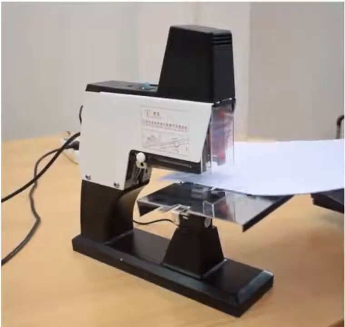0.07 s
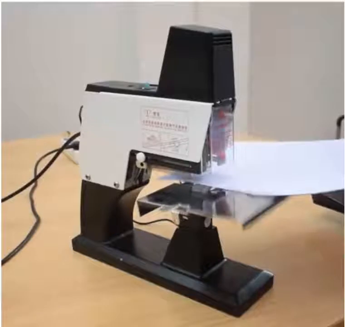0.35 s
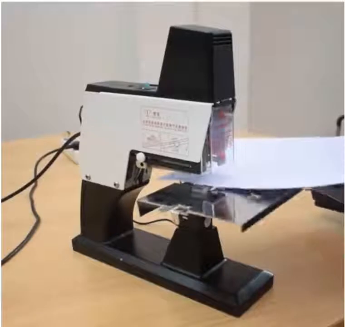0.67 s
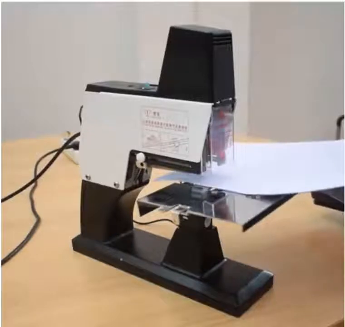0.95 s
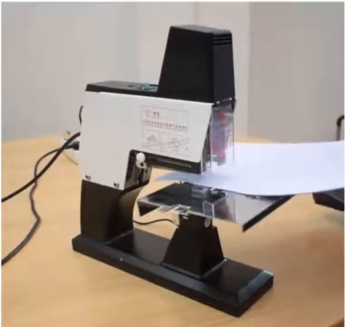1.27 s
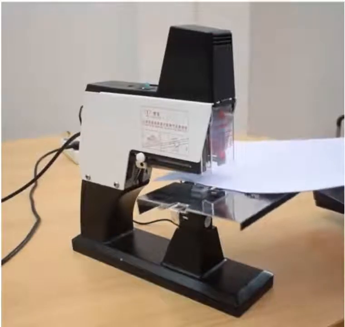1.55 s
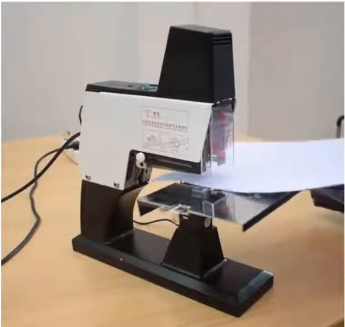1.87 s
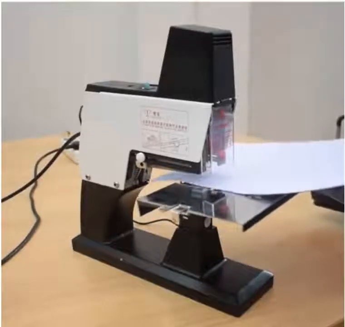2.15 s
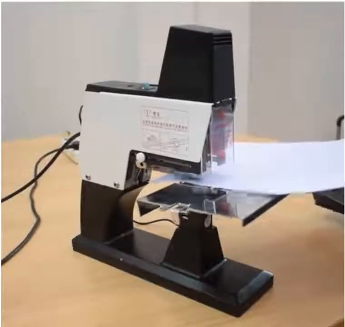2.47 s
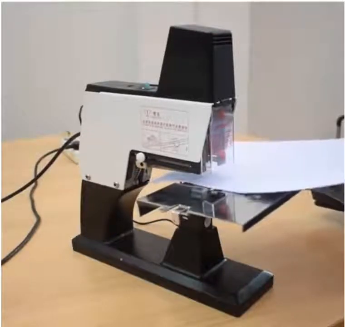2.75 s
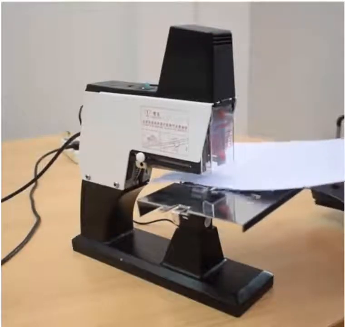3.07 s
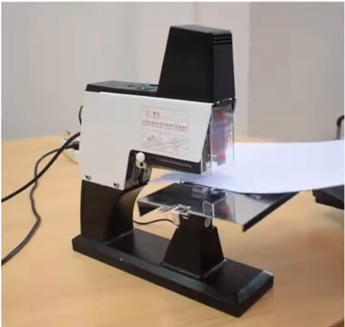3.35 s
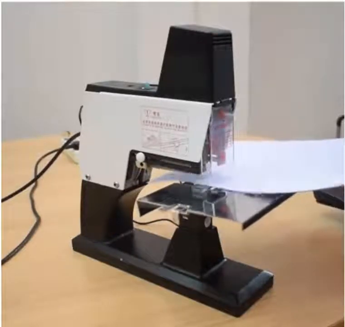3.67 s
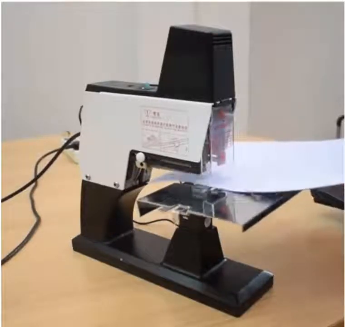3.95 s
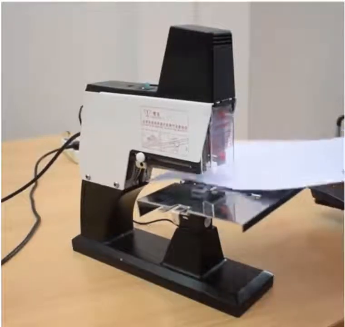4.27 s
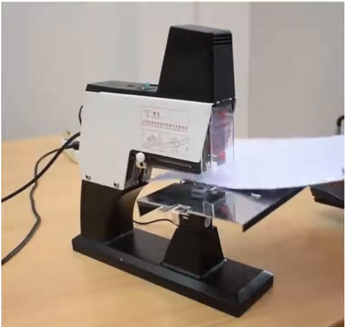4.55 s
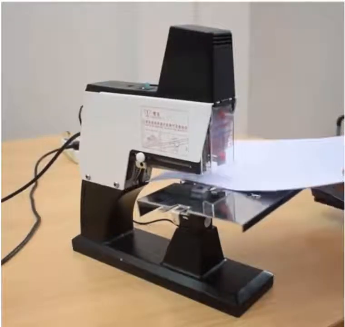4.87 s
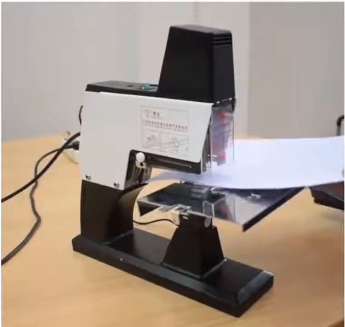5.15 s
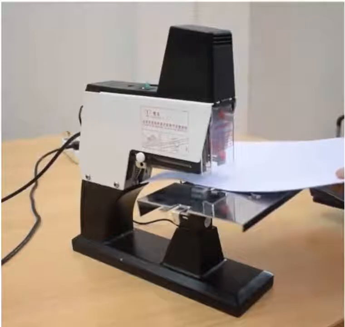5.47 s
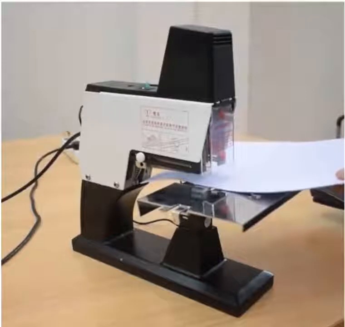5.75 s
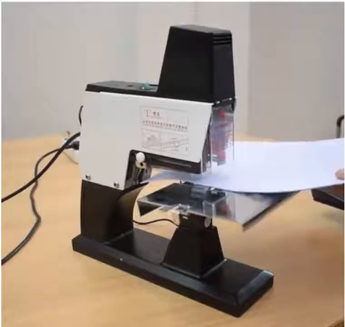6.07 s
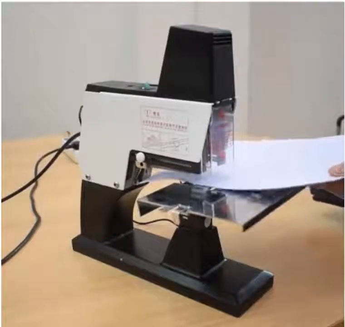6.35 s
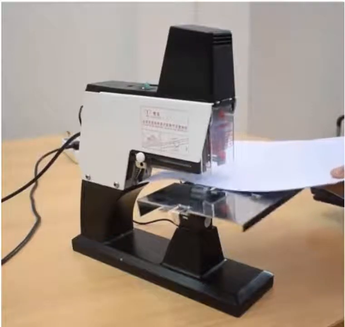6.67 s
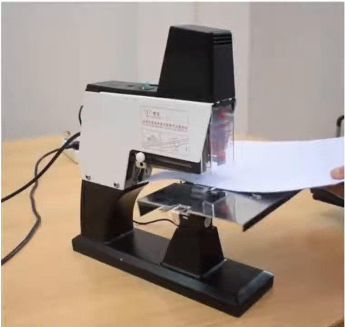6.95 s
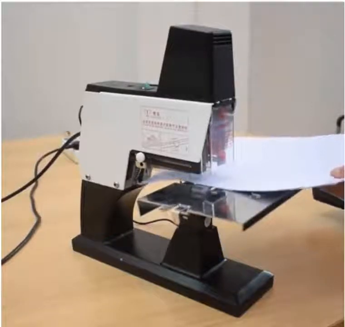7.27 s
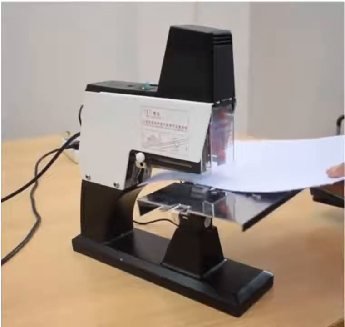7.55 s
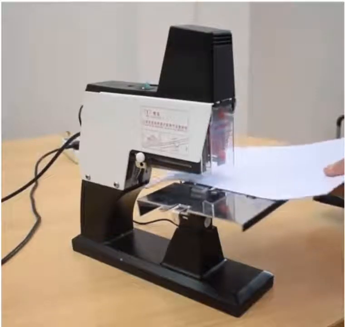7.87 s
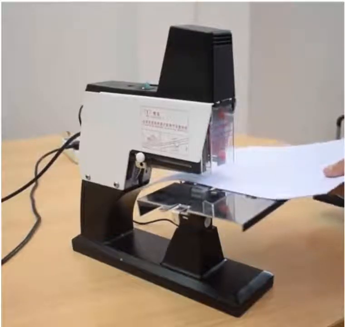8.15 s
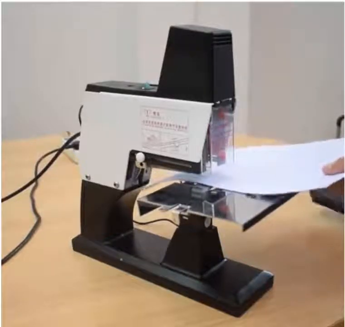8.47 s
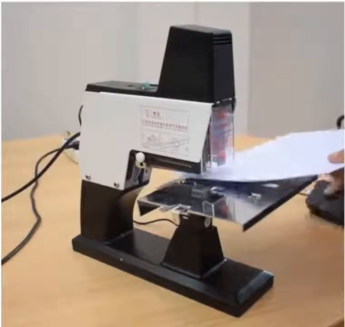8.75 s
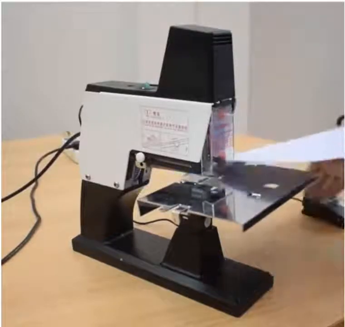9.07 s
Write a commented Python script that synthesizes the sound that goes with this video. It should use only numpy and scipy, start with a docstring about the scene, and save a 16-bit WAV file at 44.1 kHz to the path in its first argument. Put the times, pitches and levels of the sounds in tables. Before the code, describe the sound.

In a bare, reverberant room, an electric stapling machine delivers eight steady blows, each a tiny click followed by a hard knock, a steel clash and a low ringing tail. Two of them land softer. After the last, two small ticks and a sharper snap come from the lever springing back. Quiet air murmurs underneath, and the close mono microphone dulls the treble and distorts slightly on the hits.

```python
"""A solenoid stapler on a table fires eight staples into a stack of paper, in a bare, echoing room.
Each time the trip lever ticks, the switch closes and the plunger is pulled down onto the anvil:
the table thumps, the frame knocks, the steel driver clashes and bounces, and standing waves ring on.
At the end the paper is drawn out and the lever snaps back. Behind it lie murmuring air and, briefly,
a faint drone. The blows overload a close, narrow-band mono microphone."""
import sys
import numpy as np
from scipy import signal
from scipy.fft import rfft, irfft, next_fast_len
from scipy.io import wavfile
from scipy.ndimage import uniform_filter1d

SR = 44100
rng = np.random.default_rng(int(sys.argv[2]) if len(sys.argv) > 2 else 0)


def file_out(sig):
    """Save sig as 16-bit WAV at sys.argv[1]."""
    # one column per channel
    cols = np.atleast_2d(sig).T
    # limit, then scale
    lim = np.clip(cols, -1, 1)
    pcm = np.round(lim * 32767).astype(np.int16)
    wavfile.write(sys.argv[1], SR, pcm)


N = 406161
TOP_HZ = 4800  # upper edge of the noises and of the microphone
AGE = np.arange(2 * SR) / SR  # seconds since a contact

# The staples. Each row: time of the blow in seconds, knock of the frame in dB,
# pull-in from switch to blow in seconds, travel from lever tick to switch in seconds.
STAPLES = [(0.1474, -2.5, .0768, .035), (1.198, -3, .0822, .028), (2.2475, -2, .079, .028),
           (3.328, -22, .0745, .034), (4.6785, -6, .0835, 0.026), (5.7495, -3, .0795, .027),
           (6.8905, -3.5, .083, 0.022), (8.0504, -16.5, .079, .019)]
# The withdrawn paper nudges the lever. Each row: start in seconds, knock of the lever in dB.
PAPER_NUDGES = [(8.484, -23.5), (8.518, -18.5)]
# Ring of the steel driver. Each row: pitch in Hz, width in Hz, relative level in dB.
DRIVER_RESONANCES = [(1197, 33, -1), (1390, 29, 0), (1511, 20, -1), (1747, 50, -1.5), (1947, 46, -2.5),
                     (2180, 15, -2), (2687, 32, 1), (3100, 30, -1), (3620, 22, 2.5)]
# Modes of housing, table and room. Each row: pitch in Hz, relative level in dB, 60 dB decay in seconds.
STANDING_WAVES = [(90.7, -22.5, 2.26), (104, -10, 1.545), (140.3, -29, 2.5), (152.74, -11, 1.12),
                  (200.5, -10.5, 1.41), (210, -16, 1.3), (242, -17, 0.69), (267.8, -4.5, 1.107),
                  (305, -23.5, 1.3), (342.2, -17.5, 1.72), (446, -21, 1.2), (453.4, -18.5, 1.46),
                  (525, -16.5, 1.51), (583, -17.5, 1.2), (624, -12.5, 1), (645, -24, 1.2),
                  (720.7, -10.5, 0.93), (769, -18.5, 1.3), (850, -27, 1.4), (926, -18.5, 1.48),
                  (1140, -21.5, 1.5)]
# Noise colours. Each row: frequency in Hz, relative spectral level in dB.
TABLE_THUMP = [(20, -22), (50, -15.5), (75, -5.5), (110, -0.5), (200, 1.5), (300, -1.5), (450, -10.5),
               (900, -34.5)]
FRAME_KNOCK = [(150, -25.5), (260, -5), (450, -2), (750, 0), (1200, -4.5), (1600, -6), (2000, -17),
               (3500, -43.5)]
STEEL_CLASH = [(120, -25), (300, 4.5), (700, 2.5), (1200, -0.5), (2100, -0.5), (2700, 0), (3400, -1),
               (4200, -11.5)]
LEVER_ROOM_RING = [(500, -43), (880, -13), (1000, 18.5), (1120, 3), (1300, -31), (2200, -24.5)]
CONTACT_SNAP = [(200, -18), (700, -3.5), (1300, -3), (2000, -0.5), (2600, -1), (3300, 2), (4200, -8.5)]
LEVER_KNOCK = [(150, -32.5), (500, -11), (800, -12.5), (950, 0), (1100, -2.5), (1300, -15.5), (1900, -11.5),
               (2500, -16), (4000, -31.5)]
DRONE_BAND = [(520, -49.5), (600, -14.5), (625, -9.5), (665, -5), (690, -18.5), (800, -52.5)]
ROOM_AIR = [(15, -31.5), (25, -10), (134, 6), (333, -2), (672, -7), (1010, -5.5), (1140, -7.5), (1300, -7),
            (2160, -14.5), (2620, -15.5), (3170, -20.5), (3670, -21), (4000, -43), (5200, -64),
            (8800, -120)]
# The room's tail. Each row: frequency in Hz, 60 dB decay in seconds.
ROOM_DECAY = [(80, 1.86), (250, 1.44), (600, 1.455), (1300, 1.516), (2600, 1.38), (4000, 1.19)]
# Slap off the nearest walls. Each row: delay in seconds, level in dB.
WALL_ECHOES = [(0.0202, -6.5), (0.033, -13), (0.041, -12), (0.054, -10.5), (0.071, -11)]
# Tone of the microphone. Each row: frequency in Hz, gain in dB (only the cuts are applied).
MICROPHONE_CURVE = [(20, 3.5), (3550, -1), (3800, -2), (3950, -13.5), (4300, -9.5), (4500, -29),
                    (4800, -39.5)]


def blows():
    """The plunger hits the same spot each time: table and frame ring alike, loose steel rattles anew."""
    out = np.zeros(N)
    table = struck(TABLE_THUMP, t60=0.29, direct_db=-2.5, attack_s=0.0033, room_db=-6.5, build_s=0.02)
    frame = struck(FRAME_KNOCK, t60=0.38, direct_db=3.5, attack_s=0.018, room_db=-3, build_s=0.011)
    for start, thump_db, knock_db, clash_db in blow_levels():
        steel = struck(STEEL_CLASH, t60=0.3, direct_db=14.5, attack_s=0.0042, room_db=4, build_s=0.015)
        add(out, start, amp(thump_db) * table + amp(knock_db) * frame + amp(clash_db) * steel_ring(steel))
    return out


def blow_levels():
    """A harder knock brings a little more thump and clash."""
    for start, knock_db, *_ in STAPLES:
        thump_db = -4 + 0.11 * knock_db
        clash_db = -15.5 + 0.15 * knock_db
        yield start, thump_db, knock_db, clash_db


def struck(colour, t60, direct_db, attack_s, room_db, build_s):
    """A part with dense modes rings briefly while the room fills and rings on."""
    direct = amp(direct_db) * noise(colour) * fade(t60) * rise(attack_s)
    return direct + amp(room_db) * room_tail(colour) * rise(build_s)


def steel_ring(sound, ring_db=-2):
    """The steel driver favours its own narrow resonances."""
    def peaks(hz):
        return sum(amp(db) * 1j * hz * width / (pitch ** 2 - hz ** 2 + 1j * hz * width)
                   for pitch, width, db in DRIVER_RESONANCES)
    return filtered(sound, lambda hz: 1 + amp(ring_db) * peaks(hz))


def driver_bounce(typical_delay_s=0.022, bounce_db=-1):
    """The driver bounces off the staple and lands again, harder after a heavy knock."""
    out = np.zeros(N)
    for start, knock_db, *_ in STAPLES:
        landing = steel_ring(noise(STEEL_CLASH) * fade(t60=0.13) * rise(0.001))
        add(out, start + typical_delay_s * rng.uniform(0.67, 1.3), amp(knock_db + bounce_db) * landing)
    return out


def plunger(ring_db=-34, ring_lead_s=0.04, ring_width_s=0.017, scrape_db=-21, scrape_s=0.0066):
    """Just before each blow the lever's 1 kHz ring hangs in the room and the plunger scrapes down."""
    out = np.zeros(N)
    countdown = AGE[:SR // 8][::-1]  # seconds left until the blow
    for blow, *_ in STAPLES:
        ring = noise(LEVER_ROOM_RING, len(countdown)) * swell(countdown, ring_lead_s, ring_width_s)
        scrape = noise(STEEL_CLASH, len(countdown)) * np.exp(-countdown / scrape_s)  # ever faster
        add(out, blow - countdown[0], amp(ring_db) * ring + amp(scrape_db) * scrape)
    return out


def switch(snap_room_db=-10, lever_room_db=-14, wall_hz=2200, stop_db=-2):
    """The contact snaps, the lever knocks on its stop a moment later, and the room answers."""
    near, far = np.zeros(N), np.zeros(N)
    for start, snap_db, lever_db, lag in switch_cues():
        add(near, start, amp(snap_db) * tap(CONTACT_SNAP, t60=0.026, attack_s=0.00031))
        add(near, start + lag, amp(lever_db) * tap(LEVER_KNOCK, t60=0.041, attack_s=0.00069))
        # steel meets steel at the stop
        add(near, start + lag, amp(snap_db + stop_db) * tap(CONTACT_SNAP, t60=0.088, attack_s=0.0003))
        snap_tail = amp(snap_db + snap_room_db) * room_tail(CONTACT_SNAP)
        lever_tail = amp(lever_db + lever_room_db) * room_tail(LEVER_KNOCK)
        add(far, start, (snap_tail + lever_tail) * rise(0.034))
    dulled = filtered(near, lambda hz: 1 / np.hypot(1, hz / wall_hz))  # the walls soak up treble
    for delay, db in WALL_ECHOES:
        add(far, delay, amp(db) * dulled)
    return near + far


def switch_cues():
    """The clicks. Each row: start in seconds, snap in dB, lever knock in dB, its lag in seconds."""
    paper_ticks = [(blow - pull_in - travel, -41, -32.5, 0.005) for blow, _, pull_in, travel in STAPLES]
    closings = [(blow - pull_in, -31, -24, 0.005) for blow, _, pull_in, _ in STAPLES]
    nudges = [(start, lever_db - 21, lever_db, 0.003) for start, lever_db in PAPER_NUDGES]
    release = (8.6225, -19.5, -6, 0.00062)  # the freed lever springs back
    return paper_ticks + closings + nudges + [release]


def tap(colour, t60, attack_s):
    """One short contact whose first 5 ms have rms 1."""
    sound = noise(colour) * fade(t60) * rise(attack_s)
    return sound / np.std(sound[:SR // 200])


def standing_waves(feed_db=5, bloom_s=0.058, crossover_hz=250):
    """Standing waves bloom after each blow: low ones fed by the table, higher ones by the frame."""
    out = np.zeros(N)
    for hz, db, t60 in STANDING_WAVES:
        wave = amp(db + feed_db) * fade(t60) * rise(bloom_s) * np.sin(2 * np.pi * (hz * AGE + rng.random()))
        frame_share = hz ** 2 / (hz ** 2 + crossover_hz ** 2)
        for start, thump_db, knock_db, _ in blow_levels():
            add(out, start, ((1 - frame_share) * amp(thump_db) + frame_share * amp(knock_db)) * wave)
    return out


def room_tail(colour):
    """The room's diffuse answer; the treble dies first."""
    hz, t, spectrum = signal.stft(noise(colour), SR, nperseg=1024)
    decay = np.exp(-np.log(1000) * t / along(ROOM_DECAY, hz)[:, None])
    return signal.istft(spectrum * decay, SR, nperseg=1024)[1][:len(AGE)]


def faint_drone(level_db=-42, centre_s=7.7, width_s=0.39):
    """A faint wavering tone comes and goes, cresting before the last staple."""
    return amp(level_db) * noise(DRONE_BAND, N) * swell(np.arange(N) / SR, centre_s, width_s)


def room_tone(level_db=-42):
    """Steady murmur of the air in the room."""
    return amp(level_db) * noise(ROOM_AIR, N)


def amp(db):
    """Decibels to gain."""
    return 10 ** (np.asarray(db) / 20)


def along(curve, hz):
    """A curve's value at hz, on a log frequency axis."""
    frequencies, values = np.transpose(curve)
    return np.interp(np.log(hz + 1), np.log(frequencies + 1), values)


def filtered(sound, response):
    """Equalise a sound; response gives the gain at each frequency."""
    size = next_fast_len(len(sound) + SR // 2)
    return irfft(rfft(sound, size) * response(np.fft.rfftfreq(size, 1 / SR)), size)[:len(sound)]


def noise(colour, size=len(AGE)):
    """Coloured noise below TOP_HZ, at rms 1."""
    sound = filtered(rng.standard_normal(size), lambda hz: amp(along(colour, hz)) * (hz < TOP_HZ))
    return sound / np.sqrt(np.mean(sound ** 2) + 1e-20)


def fade(t60):
    """Exponential decay, 60 dB in t60 seconds."""
    return np.exp(-np.log(1000) * AGE / t60)


def rise(seconds):
    """Soft attack of a vibration."""
    return 1 - np.exp(-AGE / seconds)


def swell(t, centre, width):
    """Bell-shaped fade in and out."""
    return np.exp(-((t - centre) / width) ** 2)


def add(track, start_s, sound):
    """Mix a sound into the track."""
    first = max(round(start_s * SR), 0)
    part = track[first:first + len(sound)]
    part += sound[:len(part)]


def scene():
    """Stapler and room, mixed in mono."""
    mono = blows() + driver_bounce() + standing_waves() + plunger() + switch()
    mono = mono + faint_drone() + room_tone()
    return np.array([mono, mono])


def limiter(sound, ceiling_db=-6, window_s=0.016):
    """Gain control holds the running level under a ceiling."""
    level = np.sqrt(np.abs(uniform_filter1d(sound ** 2, int(window_s * SR))))
    return sound / (1 + (level / amp(ceiling_db)) ** 4) ** (1 / 4)


def record(dry, headroom=0.98, full_scale=0.95, crackle_hz=8000, crackle_top_hz=16000):
    """The microphone chain limits, rounds off peaks and narrows the band; crests clip and crackle."""
    held = limiter(dry.mean(axis=0))
    rounded = held / (1 + np.abs(held / headroom) ** 6) ** (1 / 6)
    narrow = filtered(rounded, lambda hz: amp(np.minimum(along(MICROPHONE_CURVE, hz), 0)) * (hz < TOP_HZ))
    clipped = np.clip(narrow, -full_scale, full_scale)
    softened = filtered(clipped, lambda hz: (hz < crackle_top_hz) / np.hypot(1, (hz / crackle_hz) ** 3))
    return np.array([softened, softened])


dry = scene()
out = record(dry)
file_out(out)
```